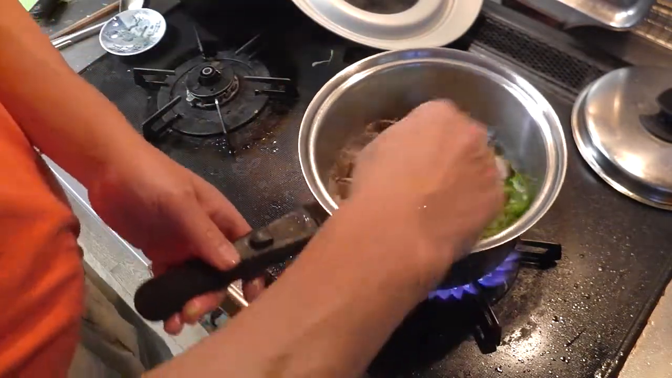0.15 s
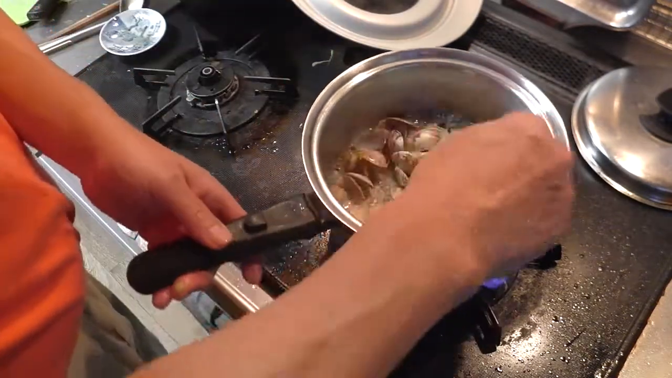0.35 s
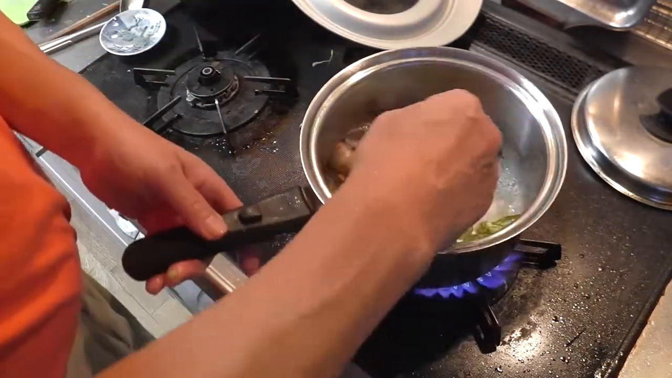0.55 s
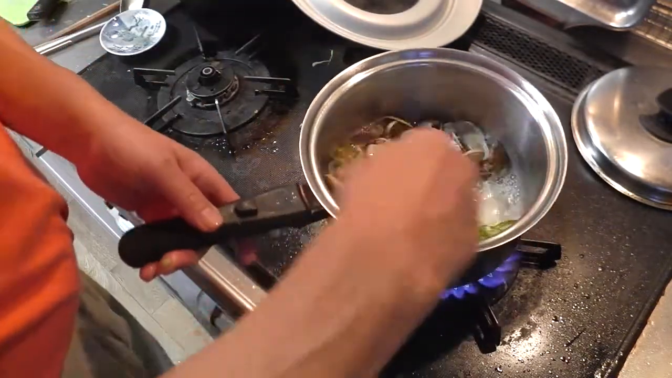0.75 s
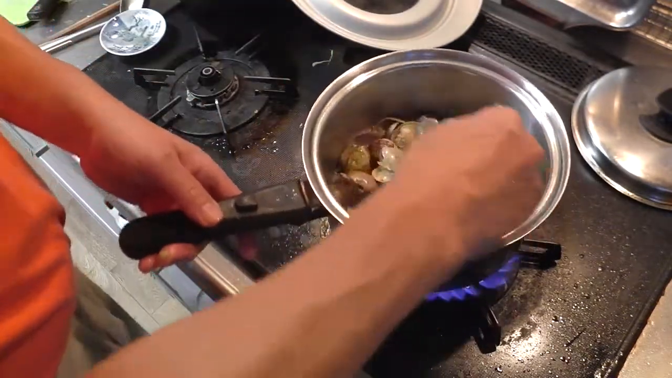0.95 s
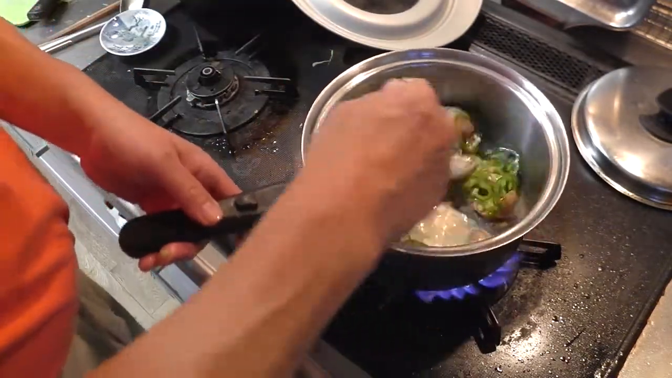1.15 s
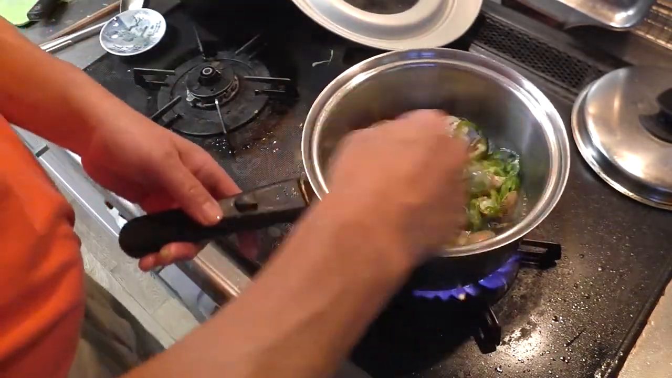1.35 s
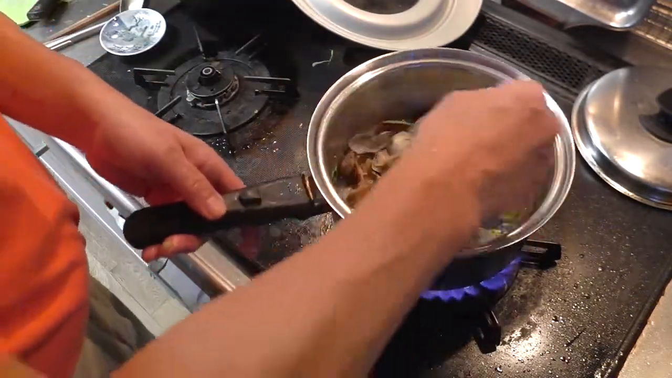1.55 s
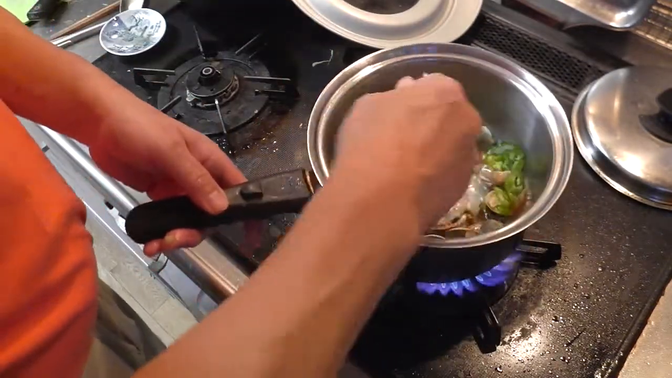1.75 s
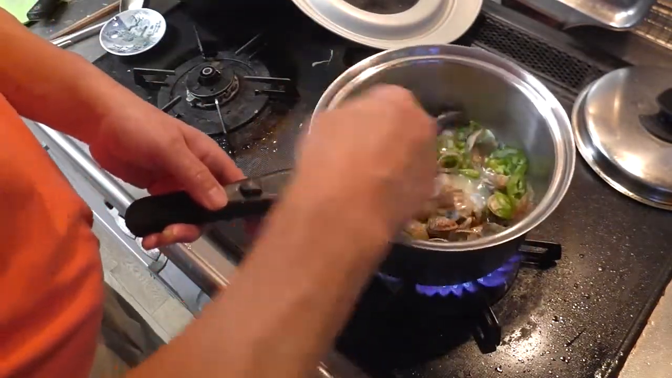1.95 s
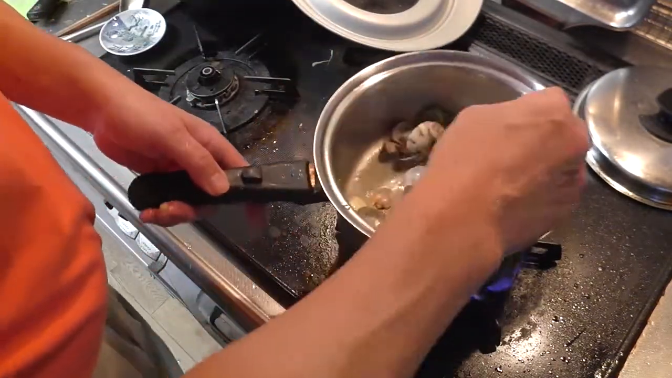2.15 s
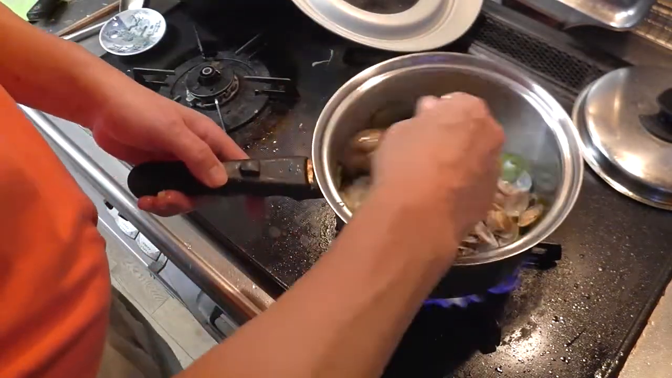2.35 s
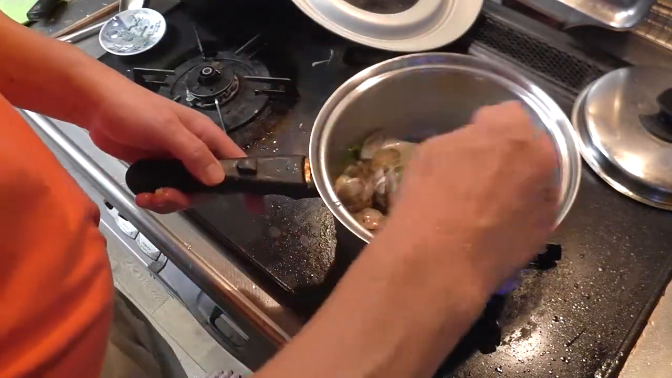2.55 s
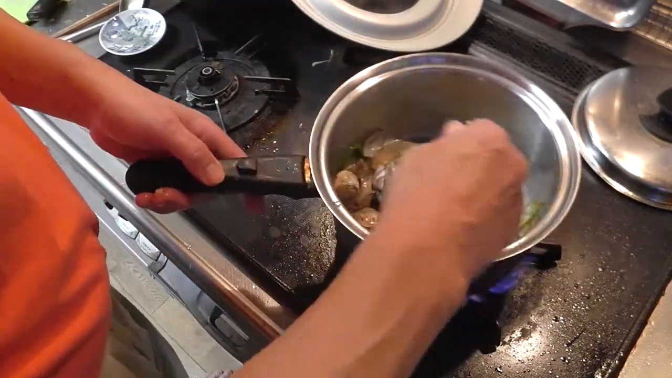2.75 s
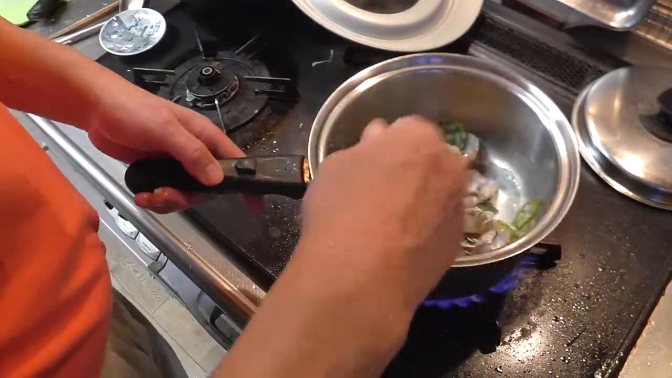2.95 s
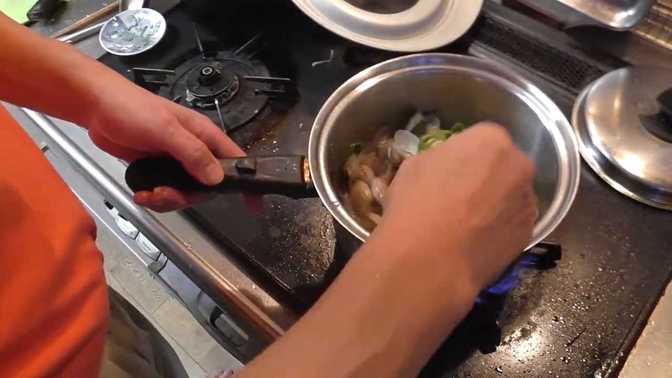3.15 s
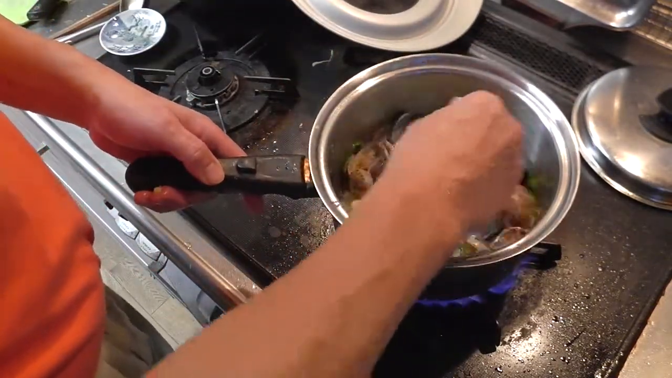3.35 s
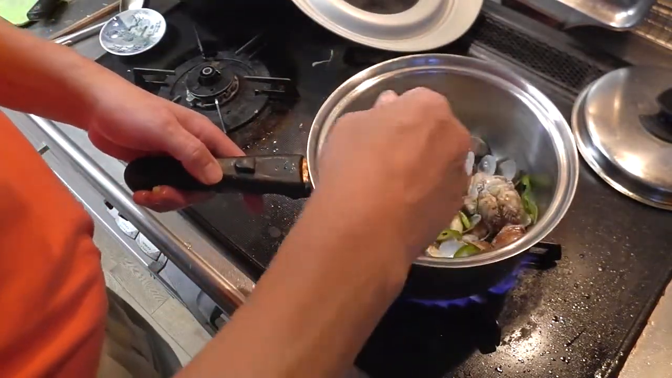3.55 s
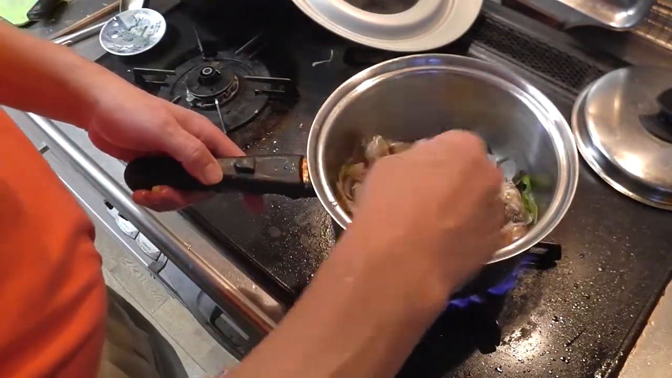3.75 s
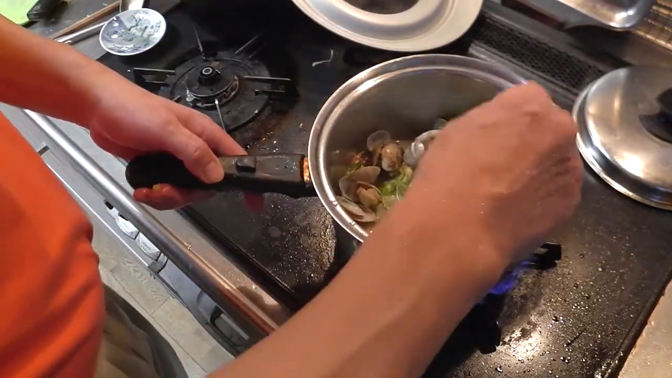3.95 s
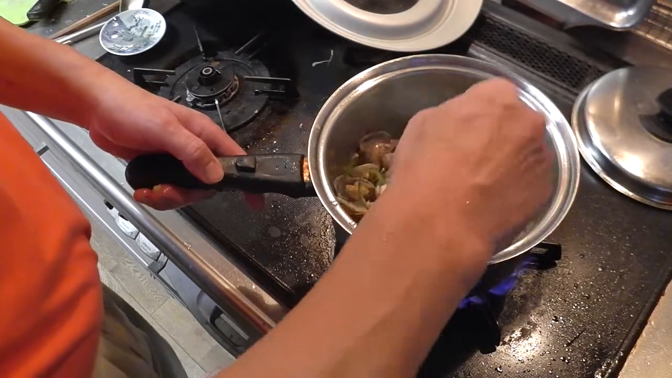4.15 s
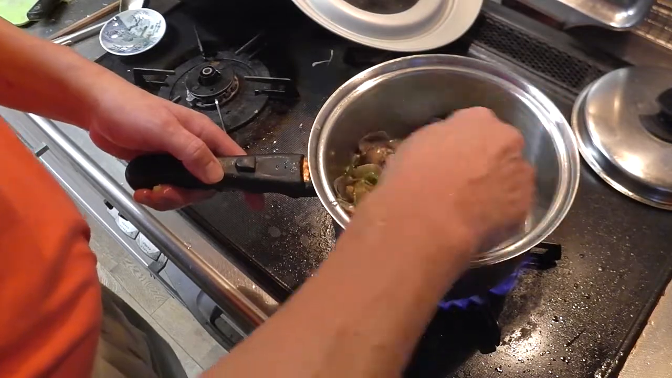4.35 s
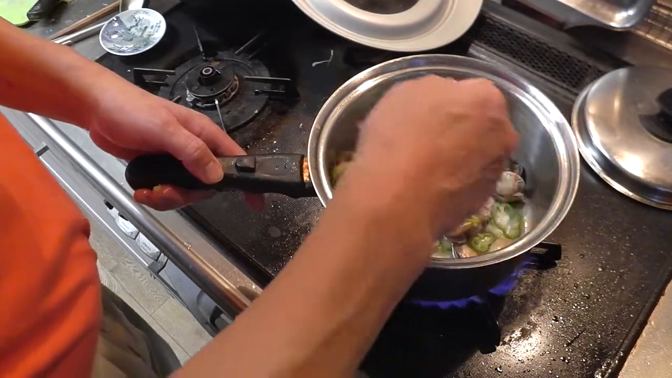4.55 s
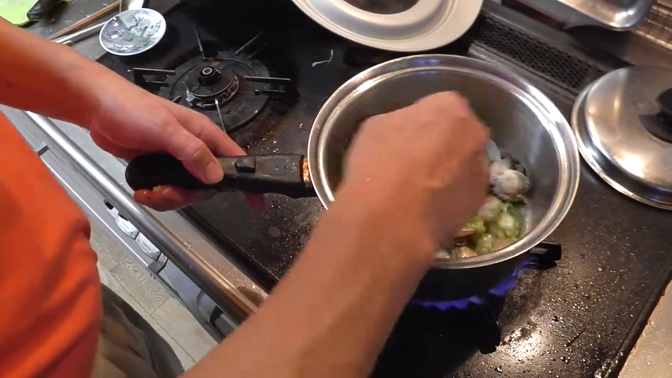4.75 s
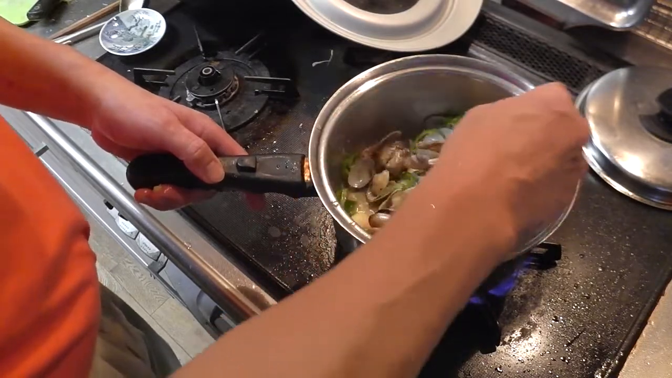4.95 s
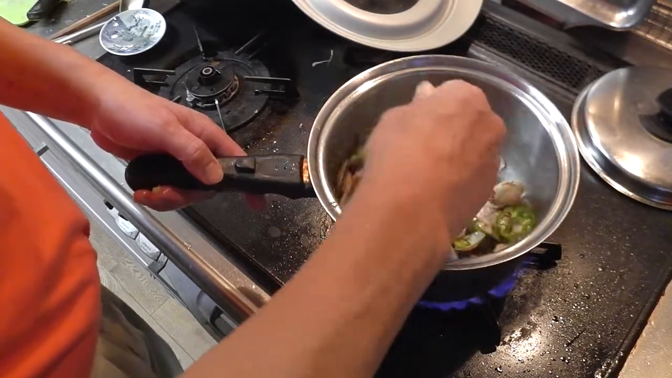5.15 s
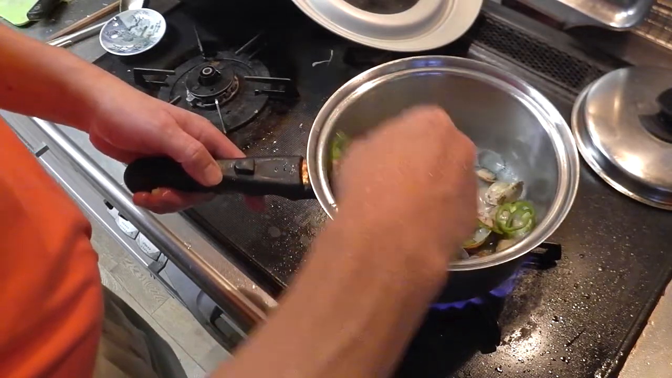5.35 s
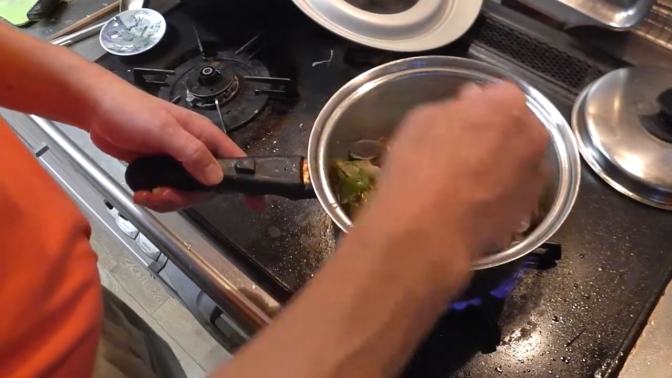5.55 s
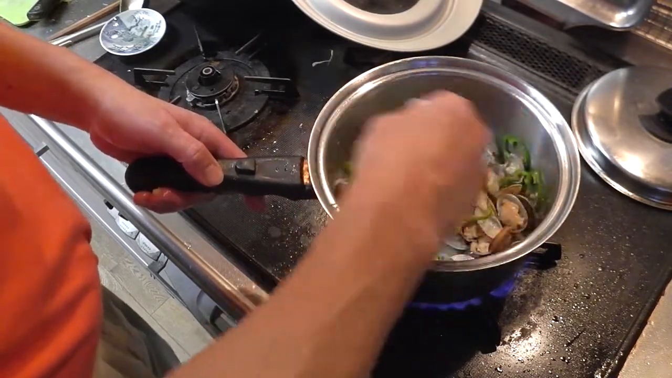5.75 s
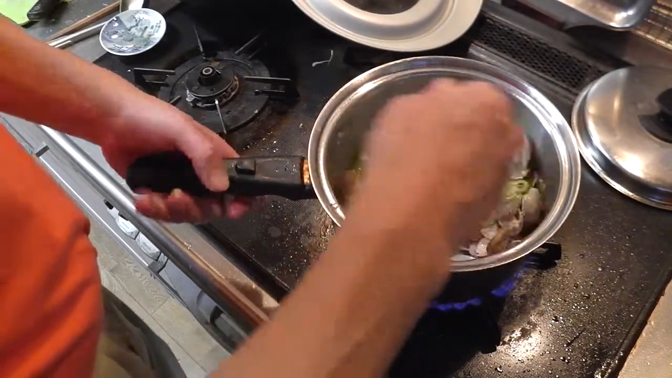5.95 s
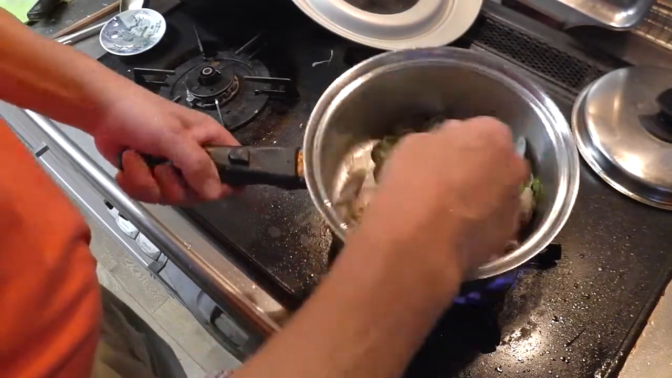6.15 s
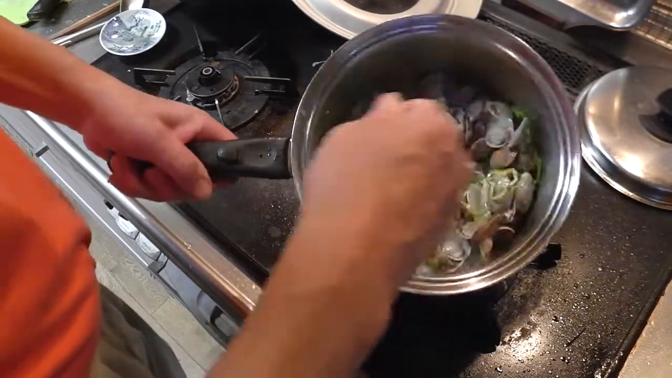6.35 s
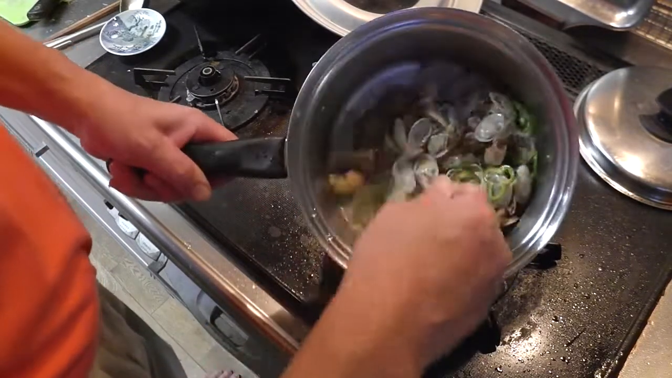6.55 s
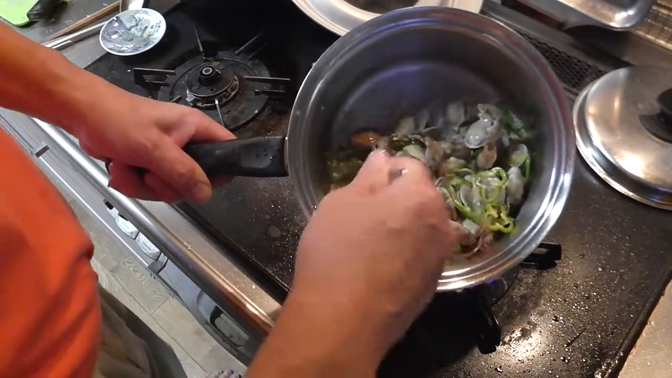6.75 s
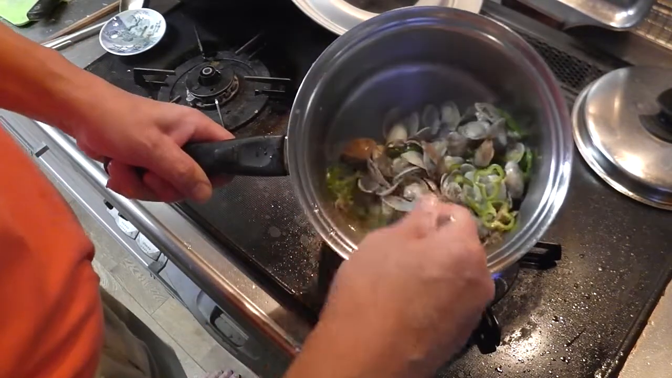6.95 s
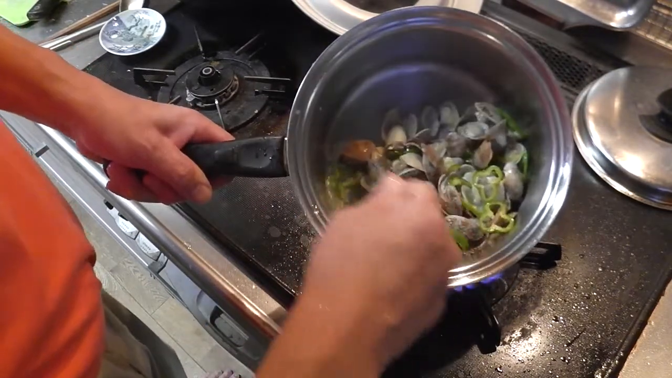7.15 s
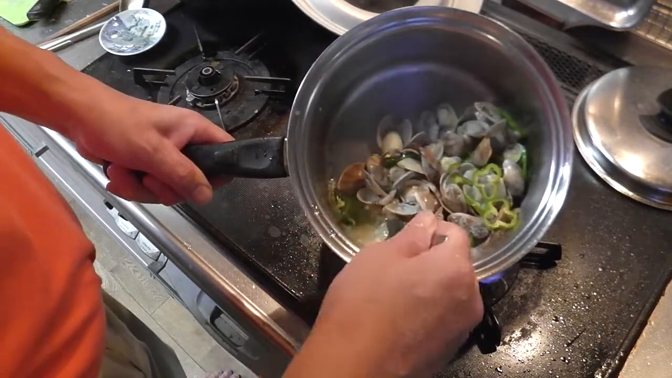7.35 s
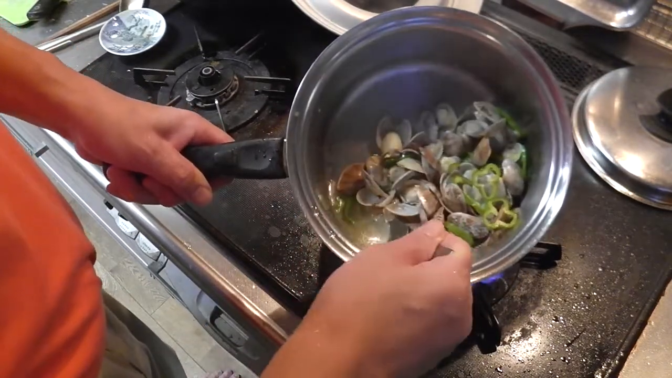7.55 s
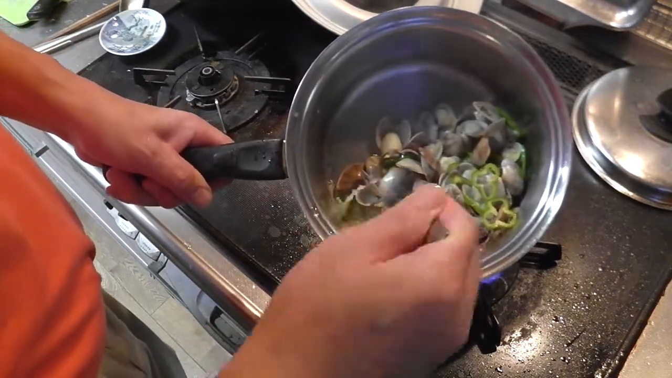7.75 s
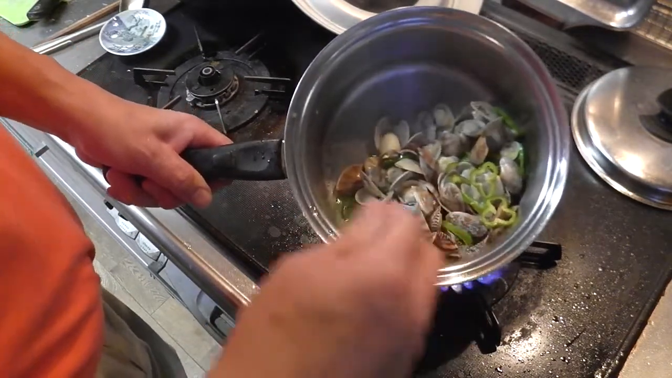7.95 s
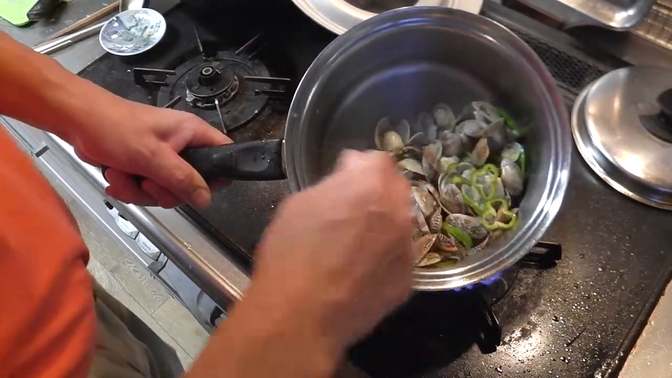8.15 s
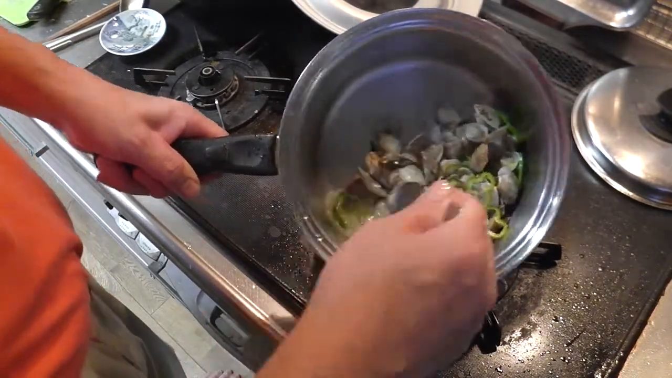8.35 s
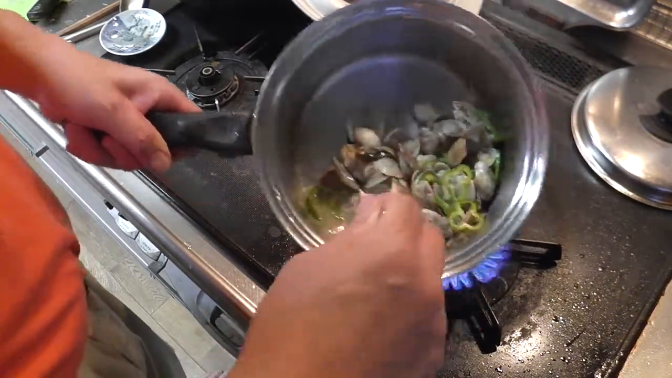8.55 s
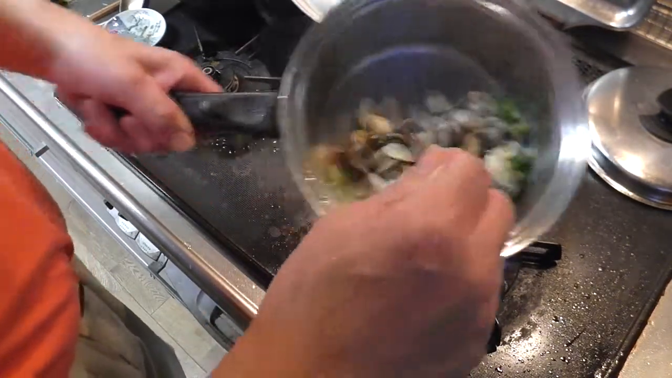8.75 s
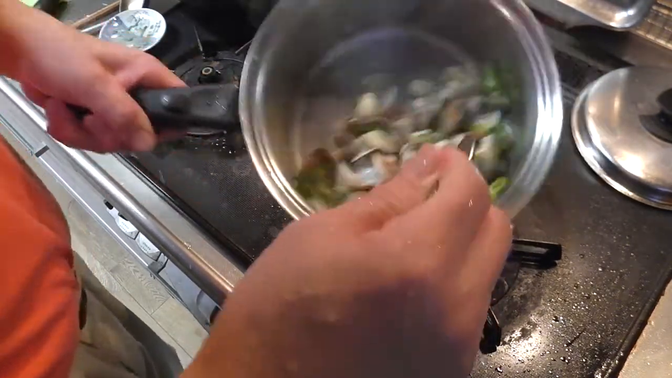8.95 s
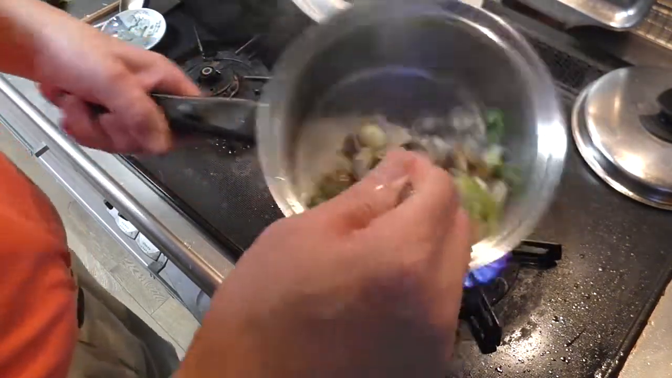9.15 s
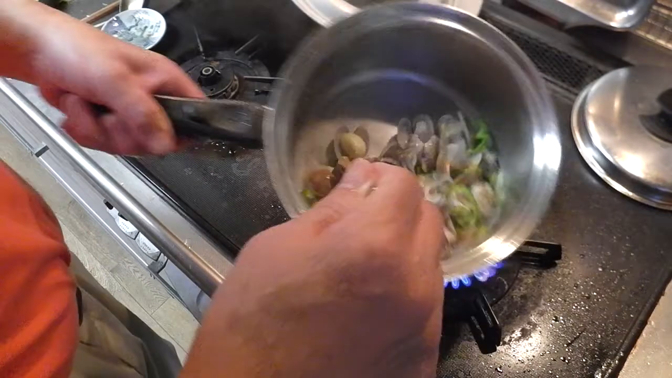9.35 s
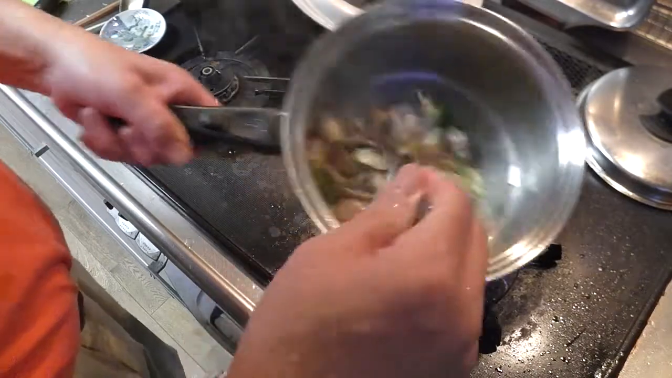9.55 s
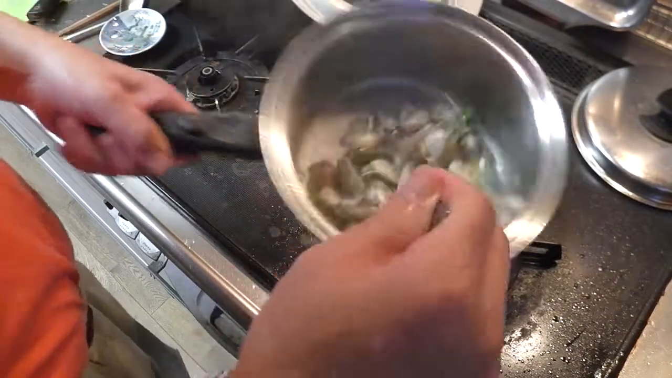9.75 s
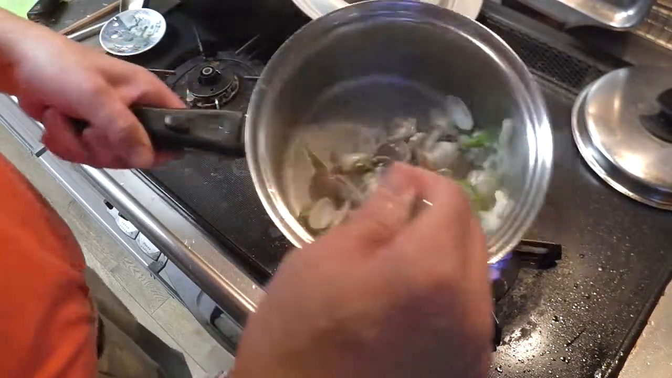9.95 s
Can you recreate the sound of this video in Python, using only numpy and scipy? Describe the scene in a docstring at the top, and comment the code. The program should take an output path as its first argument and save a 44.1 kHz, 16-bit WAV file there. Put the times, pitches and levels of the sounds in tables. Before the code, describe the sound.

Close to a stove in a small kitchen, a metal spoon stirs clams in a steel pot. The shells scrape and tumble in quick, uneven pushes, with sharp clacks that make the pot ring briefly. Broth sizzles softly over a low, rushing gas flame, and a few tiny squeaks slip in. Past the middle the pot lands on the grate with a dull clunk; the stirring thins out, then picks up again as the sizzle grows.

```python
"""A small kitchen, close to the stove: a metal spoon stirs clams in a steel pot over a rushing gas flame.
Broth sizzles on the hot base. Spoon and shells strike the pot and make it ring; each push of the spoon
swells, carries the shells and lets them settle. Brief squeaks come now and then, and the pot is set down
once. The hardest blows are rounded off, and all below about 4 kHz sounds a moment after the treble."""
import sys
import numpy as np
from scipy import signal
from scipy.fft import rfft, irfft, next_fast_len
from scipy.io import wavfile
from scipy.ndimage import map_coordinates

SR = 44100
rng = np.random.default_rng(int(sys.argv[2]) if len(sys.argv) > 2 else 0)


def digitize_waveform(pressure):
    """Quantize a signal to 16-bit integers and store it at the path in sys.argv[1].

    Rows of a 2-D input are taken as channels; values are limited to [-1, 1].
    """
    field = np.atleast_2d(pressure).T
    bounded = np.clip(field, -1, 1)
    quanta = np.round(bounded * 32767).astype(np.int16)
    wavfile.write(sys.argv[1], SR, quanta)


N = 441000

# bending modes of the pot wall: f/Hz, level/dB, t60/s
WALL_MODES = [(1447, -7, .26), (2538, -1, .22), (2600, -7, .13), (2720, -8, .1), (2980, -11, .09),
              (3450, 1, .16), (3530, -5, .1), (3940, -5, .14), (4025, -1, .18)]
# higher modes of the steel: f/Hz, level/dB, t60/s
STEEL_MODES = [(4113, -3, .16), (4160, -1, .2), (4942, -1, .16), (5100, -5, .1), (5390, -4, .15),
               (5514, -2, .22), (5870, -5, .15), (6087, -3, .25), (6685, 1, .16), (6815, 0, .17),
               (6975, 0, .13), (7473, -2, .28), (8216, 1, .17), (8300, -3, .14), (8556, -4, .26),
               (9294, -4, .26), (9588, -2, .23), (10451, -6, .2), (10690, -7, .13), (11380, -11, .12),
               (11746, -12, .25), (13168, -17, .25), (14520, -10, .12), (14712, -12, .16)]


def amp(db):
    """Decibels to gain."""
    return 10 ** (np.asarray(db) / 20)


def unit(x):
    """Scaled to rms 1."""
    return x / np.sqrt(np.mean(x ** 2) + 1e-20)


def unit_attack(x, seconds):
    """Scaled so that the first seconds have rms 1."""
    return x / np.sqrt(np.mean(x[:, :int(seconds * SR) + 1] ** 2) + 1e-20)


def along(points, hz):
    """A curve of (f/Hz, value) points, read on a log axis."""
    f, v = np.transpose(points)
    return np.interp(np.log(hz + 1), np.log(f + 1), v)


def wobble(rate):
    """A random drift with rate knots a second."""
    knots = rng.standard_normal(int(N * rate / SR) + 4)
    return map_coordinates(knots, [np.arange(N) * rate / SR], order=1)


def fade(t, t60):
    """Falls 60 dB in t60 seconds."""
    return np.exp(-np.log(1000) * t / t60)


def filtered(x, response):
    """x through a frequency response."""
    n = x.shape[-1]
    m = next_fast_len(n + 4096)
    return irfft(rfft(x, m) * response(np.fft.rfftfreq(m, 1 / SR)), m)[..., :n]


def coloured(x, eq):
    """x through an EQ curve of (f/Hz, level/dB) points."""
    return filtered(x, lambda hz: amp(along(eq, hz)))


def add(track, s, sound):
    """Mixes a sound in at s seconds."""
    part = track[:, max(0, round(s * SR)):][:, :sound.shape[1]]
    part += sound[:, :part.shape[1]]


def shifting(x, draw):
    """x through a response that is drawn anew four times a second, as spoon and arm move."""
    out, step = np.zeros((2, N)), SR // 4
    for start in range(0, N, step):
        add(out, start / SR, signal.fftconvolve(x[:, start:start + step], draw(), axes=1))
    return out


def contacts(per_s, spread_db, size):
    """Random impulses, many small and a few large."""
    chance, force = rng.random(size), rng.standard_normal(size)
    return (chance < per_s / SR) * amp(spread_db * np.clip(force, -2, 2))


def ring(modes, scatter_db, size):
    """Damped modes as (mid, side); each contact point excites them in new shares."""
    hz, db, t60 = np.transpose(modes)[:, :, None]
    t = np.arange(size) / SR
    angle = (2 * np.pi * hz * t).astype(np.float32)
    decay = amp(db + scatter_db * rng.standard_normal(hz.shape)) * fade(t, t60)
    phase = rng.uniform(0, 2 * np.pi, (2, len(hz)))
    return np.cos(phase) @ (decay * np.sin(angle)) + np.sin(phase) @ (decay * np.cos(angle))


def burner():
    """The gas flame rushes and flutters under the drone of moving air."""
    # low rush of the flame, swelling with rumbles of the pot shifting on the grate: t/s, level/dB
    rush_levels = [(0, -40.5), (.18, -31), (.3, -41.5), (.6, -35.5), (1.1, -40.5), (2.5, -42.5),
                   (4.5, -40.5), (6.9, -42), (8.6, -35.5), (9.3, -39.5)]
    # colour of the low rush: f/Hz, level/dB
    rush_eq = [(15, -55), (25, -24), (58, -9), (71, -9.5), (86, 5), (113, -9), (150, 0.5), (183, -10.5),
               (245, -8), (278, -14.5), (435, -1), (680, -12.5), (844, -15.5), (940, -11.5), (1000, -45),
               (1300, -46), (2200, -120)]
    # steady tones of the kitchen's air flow: f/Hz, width/Hz, level/dB
    air_tones = [(95, 4.9, -45.5), (153.5, 11, -47), (250, 7, -53), (454, 16, -52), (970, 34, -61.5)]

    def air_bands(f):
        return sum(amp(db) * np.sqrt(SR / 2 / width) / (1 + ((f - hz) / (width * 2 / np.pi)) ** 2)
                   for hz, width, db in air_tones)

    rush_db = np.interp(np.arange(N) / SR, *np.transpose(rush_levels)) + 1 + 2.63 * wobble(13)
    rush = amp(rush_db) * unit(coloured(rng.standard_normal((2, N)), rush_eq))
    drone = amp(-3.5) * filtered(rng.standard_normal((2, N)), air_bands)
    return rush + drone


def sizzle():
    """Tiny bubbles of broth burst on the hot base, and a few drops spit."""
    # the sizzle is steady, hushed briefly around 6.5 s and loudest near 9 s: t/s, level/dB
    sizzle_levels = [(0, -37.5), (5.5, -36.5), (6.3, -44), (6.7, -47), (7.0, -41.5), (7.3, -36),
                     (8.05, -36), (8.6, -35.5), (9.2, -30), (10, -36)]
    # colour of the bursting bubbles: f/Hz, level/dB
    sizzle_eq = [(500, -26), (930, -5), (1050, -3), (1250, 5.5), (1900, 4), (3000, 8), (4100, 5.5),
                 (5300, 6.5), (7200, 3.5), (11000, -1), (16000, -4)]
    pops = np.array([contacts(per_s=2500, spread_db=5.8, size=N) for _ in range(2)])
    pops *= rng.standard_normal((2, N))
    fizz = unit(pops) + 1.03 * rng.standard_normal((2, N))
    sizzle_db = np.interp(np.arange(N) / SR, *np.transpose(sizzle_levels)) + .37 * wobble(9.1)
    spits = amp(-9.5) * ticks()
    return amp(sizzle_db) * (unit(coloured(fizz, sizzle_eq)) + spits)


def ticks():
    """Sparse, very short snaps of a spitting drop or a shell's rim."""
    # colour of a snap: f/Hz, level/dB
    tick_eq = [(600, -20), (1200, -3.5), (3000, -5), (7000, -1.5), (11000, -2.5), (16000, -4)]
    t = np.arange(SR // 300) / SR
    impulses = contacts(per_s=26, spread_db=3.5, size=N)[None]
    snaps = shifting(impulses, lambda: rng.standard_normal((2, len(t))) * fade(t, .0014))
    return unit(coloured(snaps, tick_eq))


def shell(band_hz, t60, crack, crack_t60, count, size=3000):
    """One shell struck: a crack and a few short modes that depend on its size."""
    pitches = rng.uniform(*band_hz, count)
    decays = t60 * np.exp(.5 * rng.standard_normal(count))
    modes = np.column_stack([pitches, np.zeros(count), decays])
    snap = rng.standard_normal((2, size)) * fade(np.arange(size) / SR, crack_t60)
    return unit(unit(ring(modes, scatter_db=3, size=size)) + crack * unit(snap))


def favoured(hz, centre_hz, reach_octaves=.14):
    """Near 1 for the pitches that a contact point excites best, 0 for the rest."""
    return np.exp(-.5 * (np.log2((hz + 1) / centre_hz) / reach_octaves) ** 2)


def pot_modes(centre_hz, lift_db=7.5):
    """The pot's modes for one contact point; the higher the pitch it favours, the less the wall bends."""
    wall_db = 3 - 4.5 * np.log2(centre_hz / 3020)
    modes = [(hz, db + wall_db, t60) for hz, db, t60 in WALL_MODES] + STEEL_MODES
    return [(hz, db + lift_db * favoured(hz, centre_hz), t60) for hz, db, t60 in modes]


def buzzing(x, depth):
    """Loose shells lying on the ringing steel make its tones flutter."""
    samples = np.arange(x.shape[1])
    flutter = np.interp(samples * 330 / SR, samples, rng.standard_normal(len(samples)))
    return x * (1 + depth * flutter)


def blows():
    """Each blow clacks, knocks hollowly and rings the pot; the contact point picks the modes."""
    # spoon and shells hit the pot: t/s, clack/dB, knock/dB, ring/dB, favoured f/Hz, tilt/(dB per octave)
    hits = [(.002, -10.5, -43, -40, 6000, -7), (0.0357, -12, -22, -36, 3450, -17),
            (.173, -18, -17, -44, 3450, -3), (.215, -15, -42, -52, 5000, -8),
            (0.2608, -5.5, -13, -15, 1900, -23), (0.428, -20, -40, -29, 2520, 3),
            (0.554, -15, -38, -41, 3450, -6), (0.6445, -11, -33.5, -24, 8300, -7),
            (.667, -9, -16, -27, 3450, -6), (.836, -15.5, -18.5, -42, 5000, -13),
            (0.974, -12, -30, -38, 8300, -4), (1.1196, -12.5, -44, -26, 6950, -7),
            (1.137, -10, -32, -31, 2540, 4), (1.187, -8.5, -31, -29, 2540, 3),
            (1.249, -16, -22, -31, 5400, -6), (1.371, -15.5, -33, -32, 7470, 0),
            (1.5425, -11.5, -18, -33, 3520, -7), (1.79, -15, -42, -32.5, 1450, 3),
            (1.818, -16, -37, -28.5, 1450, -6), (2.1188, -12.5, -19, -26, 3480, 1),
            (2.2024, -14, -18.5, -39, 3450, -6), (2.304, -11, -30, -23.5, 8100, -4),
            (2.4902, -14.5, -32, -50, 9500, 0), (2.615, -8, -15.5, -26.5, 6800, -6),
            (2.7933, -15, -28, -45, 3450, 8), (2.879, -16, -30, -42, 3450, 6),
            (2.9375, -8, -20, -23, 7300, 2), (3.1157, -12.5, -45, -25.5, 7470, 6),
            (3.174, -17, -44, -29, 3430, -3), (3.3035, -13.5, -14, -34, 6800, -9),
            (3.587, -12.5, -24, -28, 3540, -9), (3.9298, -18, -25, -44, 5000, -3),
            (3.968, -15.5, -22, -58, 6800, 7), (4.2228, -9.5, -19, -24, 3800, 6),
            (4.566, -22, -35, -24, 7040, 3), (4.581, -17, -23, -19, 3280, 2),
            (4.6626, -13, -30, -31, 3450, 5.5), (4.854, -8, -17, -26, 2540, 3),
            (4.9399, -17, -31, -30, 4330, -1), (5.256, -13, -36, -37, 1450, 19),
            (5.5862, -12, -48, -31, 9300, -3), (5.6087, -8, -24, -17.5, 2150, -1),
            (5.726, -17, -33, -34, 3450, 5), (5.962, -8, -16.5, -26, 5430, -2),
            (6.0169, -12, -17.5, -28, 2540, -2), (6.163, -15, -47, -48, 6800, -4),
            (6.3338, -5, -23, -24, 9300, -1), (6.4554, -23.5, -22.5, -32, 7400, -8),
            (6.6035, -20.5, -40, -45, 6800, -10), (6.7165, -5.5, -22, -31, 2540, -6.5),
            (6.7498, -17, -25, -32, 6800, -7), (6.79, -14.5, -16.5, -36, 2760, -6),
            (7.081, -20.5, -22.5, -38, 3450, 1), (7.098, -13, -23, -38, 6800, -7),
            (7.1517, -14.5, -23.5, -46, 2750, -7), (7.26, -32, -28.5, -53, 2750, -1),
            (7.6156, -22.5, -34, -54, 7470, 9), (8.077, -14.5, -14.5, -29, 4200, -1),
            (8.1642, -8.5, -14.5, -35, 1900, -15), (8.4993, -12.5, -27, -38, 5470, -10.5),
            (9.0397, -15, -37, -41, 8300, 0), (9.085, -10.5, -16.5, -41, 6800, -6),
            (9.18, -14.5, -42, -38, 2540, 1), (9.301, -14, -18, -28, 5400, -5),
            (9.3187, -16, -21, -44, 3450, -3), (9.415, -17, -34, -35, 6800, 8),
            (9.493, -13.5, -31.5, -41, 6800, -4), (9.7119, -13.5, -21, -29.5, 5600, -2),
            (9.8012, -13, -26, -41, 5500, 0), (9.9393, -18, -39, -40, 4970, 2)]
    # colour of the sharp clack: f/Hz, level/dB
    clack_eq = [(2500, -57), (3800, -5), (4400, -2.5), (6800, 2), (8300, 1.5), (10000, 0.5), (12500, -5.5),
                (16000, -4.5)]
    # colour of the hollow knock: f/Hz, level/dB
    knock_eq = [(150, -30), (400, -8), (700, 7), (1000, -5), (1350, 6), (1800, -5.5), (2600, -0.5),
                (3600, 4.5), (4100, -2), (5500, -36)]
    out = np.zeros((2, N))
    for s, clack_db, knock_db, ring_db, centre_hz, tilt in hits:
        edge = shell((4000, 13000), t60=.045, crack=.9, crack_t60=.04, count=22)
        hollow = shell((1800, 4000), t60=.06, crack=1.1, crack_t60=.07, count=12)
        clack = coloured(edge, [(hz, db + tilt * np.log2(hz / 7000)) for hz, db in clack_eq])
        knock = filtered(hollow, lambda hz: amp(along(knock_eq, hz) + 3 * favoured(hz, centre_hz)))
        steel = buzzing(ring(pot_modes(centre_hz), scatter_db=3, size=13000), depth=.41)
        add(out, s, amp(clack_db - 3.5) * unit_attack(clack, .0077))
        add(out, s, amp(knock_db - 5.5) * unit_attack(knock, .018))
        add(out, s, amp(ring_db) * unit_attack(steel, .08))
    return out


def push(t, swell, carry):
    """Envelope in dB of one push: the spoon bites, gathers shells, carries them and stops."""
    bite_db, settle_db = -8, -13.5
    bite_rate, slip_rate, stop_rate, settle_rate = 700, 5, 184, 69  # dB/s
    rise = bite_db * (1 - np.clip(t / swell, 0, 1)) + bite_rate * np.minimum(t, 0)
    slip = slip_rate * np.clip(t - swell, 0, carry)  # shells slide off the moving spoon
    after = np.maximum(t - swell - carry, 0)
    fall = np.maximum(-stop_rate * after, settle_db - settle_rate * after)  # the heap goes on settling
    return rise - slip + fall


def stirring():
    """Envelopes in dB of scraping and tumbling; the strongest push of the moment drives the heap."""
    # pushes of the spoon: t/s, swell/s, carry/s, edges scraping/dB, hollow shells tumbling/dB
    strokes = [(.005, 0.052, 0.052, -16.5, -20.5), (.285, 0.022, 0.025, -21.5, -19.5),
               (.375, 0.024, 0.086, -18.5, -21.5), (.53, 0.026, 0.043, -25, -28.5),
               (.645, .035, 0.086, -22.5, -24), (.86, 0.098, 0.032, -21.5, -24.5),
               (1.0, 0.028, 0.045, -28.5, -30), (1.127, .035, .26, -21, -28),
               (1.46, 0.057, 0.017, -21.5, -26), (1.62, 0.015, 0.048, -26, -30),
               (1.79, 0.057, 0.031, -25.5, -35.5), (1.88, 0.077, 0.045, -18.5, -28),
               (2.115, 0.012, 0.011, -29, -33), (2.205, 0.057, 0.12, -28, -33),
               (2.53, 0.038, .008, -28.5, -44), (2.615, 0.015, 0.053, -22.5, -29.5),
               (2.775, 0.017, 0.016, -28.5, -42), (2.85, 0.04, 0.018, -26.5, -50),
               (2.94, 0.12, .03, -21.5, -29), (3.13, 0.032, 0.23, -25, -32.5),
               (3.525, 0.011, 0.0084, -28, -32), (3.58, .03, 0.049, -27.5, -33.5),
               (3.67, 0.08, .012, -22.5, -27), (3.931, 0.033, 0.017, -25, -29),
               (4.0, 0.036, 0.079, -25.5, -33.5), (4.225, 0.11, .065, -22, -30.5),
               (4.565, 0.026, 0.017, -22.5, -36), (4.65, 0.071, 0.12, -24, -31.5),
               (4.92, 0.095, 0.013, -20.5, -26), (5.12, 0.072, .008, -21.5, -28.5),
               (5.25, 0.1, 0.064, -20, -28), (5.615, 0.028, .04, -21.5, -30),
               (5.715, 0.023, .06, -20.5, -29), (6.01, 0.033, 0.037, -20, -24.5),
               (6.1, 0.027, 0.043, -28.5, -30), (6.355, 0.051, 0.083, -24.5, -30),
               (6.495, 0.033, 0.0055, -25, -24), (6.57, 0.027, 0.026, -30, -32),
               (6.755, .04, .006, -26, -31), (6.88, 0.025, 0.082, -37, -36.5),
               (7.08, 0.065, .025, -31, -31.5), (8.13, .03, 0.019, -21.5, -24),
               (8.49, 0.054, .02, -38.5, -45), (8.605, 0.038, .02, -32.5, -31.5),
               (8.732, 0.039, 0.02, -22.5, -26), (8.881, 0.056, 0.021, -15.5, -22.5),
               (9.01, 0.035, 0.044, -23.5, -29), (9.16, 0.042, 0.11, -24.5, -30),
               (9.41, 0.029, 0.021, -15.5, -25), (9.53, 0.044, .025, -17.5, -24),
               (9.704, 0.024, 0.016, -20.5, -25), (9.79, 0.027, 0.019, -21, -27.5),
               (9.915, 0.047, .015, -26, -28.5)]
    t = np.arange(0, N, SR // 1000) / SR
    pushes = [np.add.outer(db, push(t - s, swell, carry)) for s, swell, carry, *db in strokes]
    uneven_db = 1.4 * wobble(70)  # shells catch and give way
    return [np.interp(np.arange(N) / SR, t, db) + uneven_db for db in np.max(pushes, axis=0)]


def rattle(band_hz, t60, crack, wash, shells=600):
    """One shell after another chatters briefly over the wash of countless wet, rubbing edges."""
    chatter, window = np.zeros((2, N)), np.hanning(SR // 12)
    for s in (np.arange(shells) + rng.random(shells)) / shells * N / SR:
        touches = window * contacts(per_s=300, spread_db=4, size=len(window))
        body = shell(band_hz, t60, crack, crack_t60=.0041, count=14, size=600)
        add(chatter, s - len(window) / SR / 2, signal.fftconvolve(touches[None], body, axes=1))
    return unit(chatter) + wash * rng.standard_normal((2, N))


def singing(drive, modes):
    """The steel sings along with the shells that rub over it."""
    steel = shifting(drive[:1], lambda: ring(modes, scatter_db=3, size=12000))
    return drive.std() * unit(steel)


def heap():
    """The spoon drives the shells over each other and along the steel; now and then a rim snaps free."""
    # colour of scraping shell edges: f/Hz, level/dB
    scrape_eq = [(2500, -25.5), (3700, 1), (4300, -2), (5500, -0.5), (7000, 0.5), (9000, -4.5), (10500, -5),
                 (12500, -12.5), (16000, -11.5)]
    # colour of tumbling hollow shells: f/Hz, level/dB
    tumble_eq = [(150, -49), (400, -15), (680, 7), (1000, -9), (1350, 2.5), (1650, -10), (2000, -3.5),
                 (2600, 0), (3600, -1.5), (4200, 1), (5500, -26)]
    scrape_db, tumble_db = stirring()
    edges = rattle((4000, 13000), t60=.024, crack=.9, wash=.39)
    hollows = rattle((1500, 4000), t60=.029, crack=1.5, wash=.35)
    scrape = amp(scrape_db - 1.2) * unit(coloured(edges, scrape_eq))
    tumble = amp(tumble_db - 1.28) * unit(coloured(hollows, tumble_eq))
    steel = amp(-15) * singing(scrape, STEEL_MODES)
    wall = amp(-17.5) * singing(tumble, WALL_MODES)
    rim_snaps = amp(scrape_db - 11) * ticks()
    return scrape + tumble + steel + wall + rim_snaps


def kitchen():
    """The brief echo of hard walls, as an impulse response."""
    # decay of the room: f/Hz, t60/s
    decays = [(200, 0.23), (2000, 0.34), (8000, 0.032), (15000, 0.26)]
    hz, t, noise = signal.stft(rng.standard_normal((2, SR // 4)), SR, nperseg=256)
    tail = signal.istft(noise * fade(t, along(decays, hz)[:, None]), SR, nperseg=256)[1]
    predelay = SR // 300
    return np.pad(tail / np.linalg.norm(tail[0]), ((0, 0), (predelay, 0)))


def squeaks():
    """Brief rough tones: squeaks near 7 kHz and one faint, very high whistle."""
    # the squeaks and the whistle: t/s, f/Hz, level/dB
    tones = [(3.888, 7040, -42), (4.252, 6800, -33), (6.959, 7000, -37), (7.615, 7140, -35),
             (8.165, 15100, -31), (9.262, 6900, -29)]
    out, t = np.zeros((2, N)), np.arange(SR // 8) / SR
    attack = 1 - fade(t, .0083)
    for s, hz, db in tones:
        tone = buzzing(ring([(hz, 0, .09)], scatter_db=0, size=len(t)), depth=.52)
        add(out, s, amp(db) * unit_attack(tone * attack, .085))
    return out


def set_down():
    """The pot's base lands on the iron grate with a dull clunk."""
    # the landing: t/s, level/dB
    landings = [(6.523, -16)]
    # modes of the pot on the grate: f/Hz, level/dB, t60/s
    grate_modes = [(215, -12, .1), (290, -8, .1), (344, -4, 0.13), (424, 0, 0.12), (525, 10, 0.043),
                   (680, 4, .08), (860, -20, 0.06), (1330, -10, .08), (2240, -6, .05), (2720, -6, 0.084),
                   (3510, -1, 0.14)]
    # colour of the thud: f/Hz, level/dB
    thud_eq = [(30, -40), (80, -18), (200, -4), (650, 5.5), (1100, -23), (3500, -20), (4500, -45)]
    out, t = np.zeros((2, N)), np.arange(SR // 4) / SR
    for s, db in landings:
        thud = unit(coloured(rng.standard_normal((2, len(t))), thud_eq) * fade(t, .13))
        grate = unit(ring(grate_modes, scatter_db=.99, size=len(t)))
        add(out, s, amp(db) * unit_attack(thud + .95 * grate, .029))
    return out


def scene():
    """The stereo mix: the pot stands a little to the right, and only its treble spreads wide."""
    # stereo width: f/Hz, side over mid/dB
    width = [(30, -10), (80, -23.5), (200, -15.5), (1200, -16), (2500, -26.5), (4000, -13), (6000, -9),
             (9000, -4.5), (14000, -3.5)]
    # stereo balance: f/Hz, left over right/dB
    balance = [(100, -1.3), (350, 1.7), (800, -1.2), (3000, 0), (6000, -2), (10000, -2.7)]
    pot = blows() + heap() + squeaks() + set_down()
    room = amp(-12) * shifting(pot, kitchen)
    mid, side = pot + room + sizzle() + burner()
    side = coloured(side, width)
    stereo = np.array([mid + side, mid - side])
    return filtered(stereo, lambda hz: amp(np.outer([.5, -.5], along(balance, hz))))


def record(dry):
    """The band below the crossover arrives late; peaks are rounded off and the very top is cut."""
    crossover_hz, lag_s, top_hz = 4020, .0212, 15750

    def late_lows(hz):
        low = 1 / (1 + (hz / crossover_hz) ** 36)
        return 1 - low + low * np.exp(-2j * np.pi * hz * lag_s)

    lead = round(lag_s * SR)
    under_way = np.pad(dry, ((0, 0), (lead, 0)), "reflect")  # the lows sound from the first instant
    staggered = filtered(under_way, late_lows)[:, lead:]
    rounded = staggered / (1 + staggered ** 6) ** (1 / 6)
    return filtered(rounded, lambda hz: 1 / (1 + (hz / top_hz) ** 200))


dry = scene()
out = record(dry)
digitize_waveform(out)
```